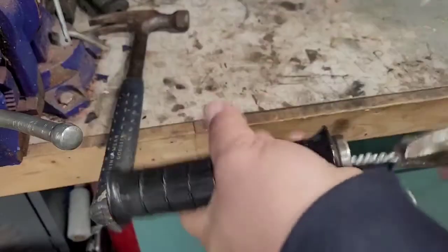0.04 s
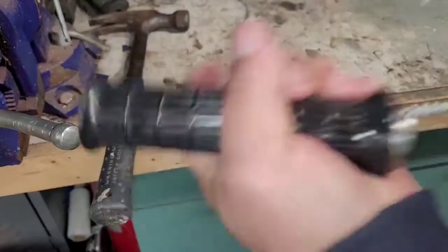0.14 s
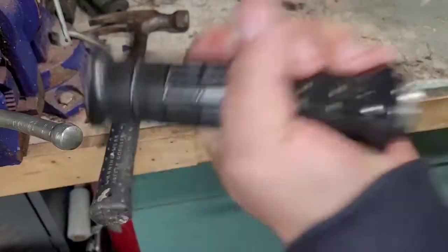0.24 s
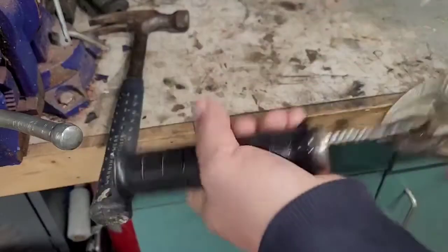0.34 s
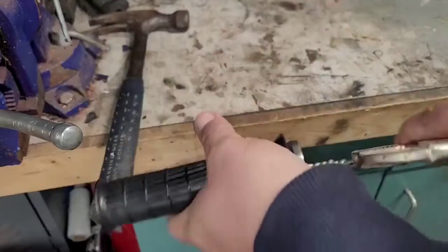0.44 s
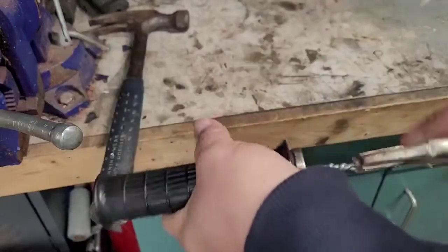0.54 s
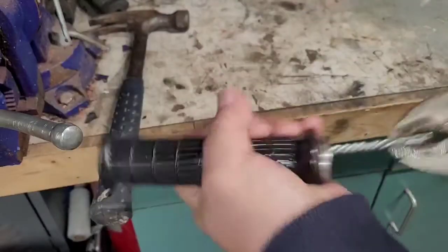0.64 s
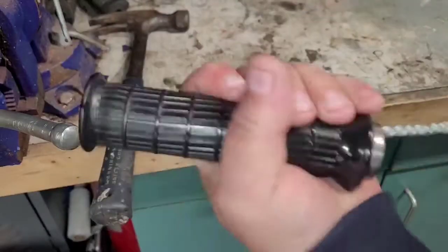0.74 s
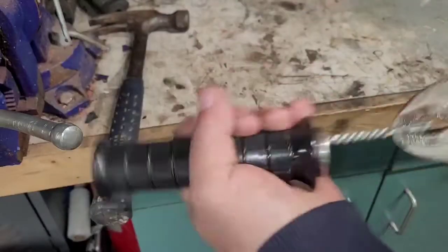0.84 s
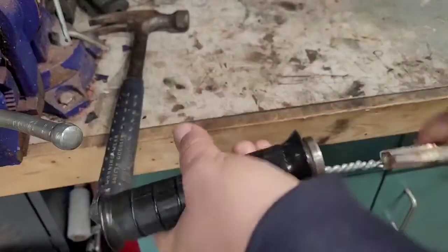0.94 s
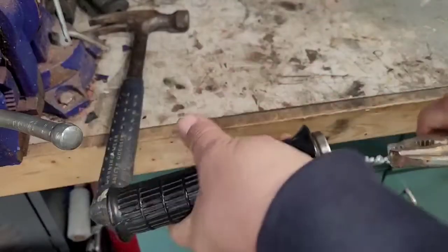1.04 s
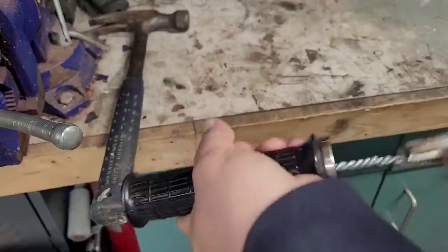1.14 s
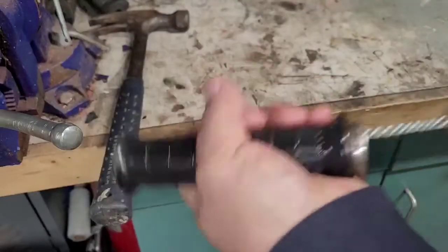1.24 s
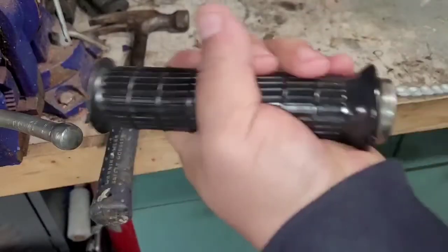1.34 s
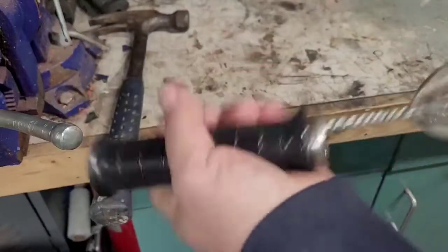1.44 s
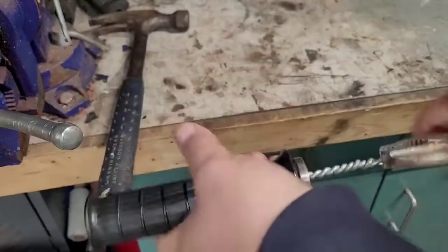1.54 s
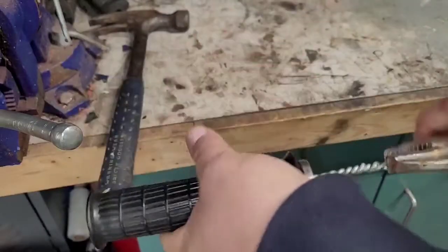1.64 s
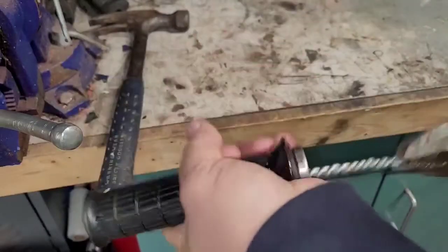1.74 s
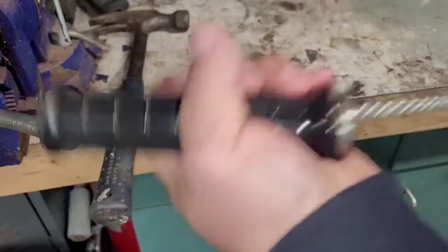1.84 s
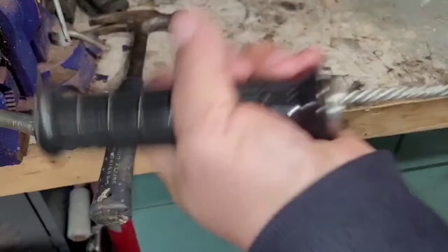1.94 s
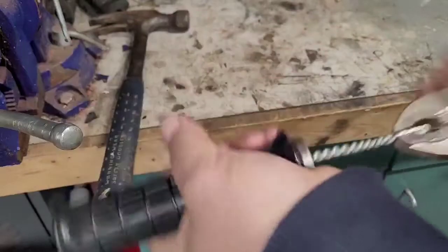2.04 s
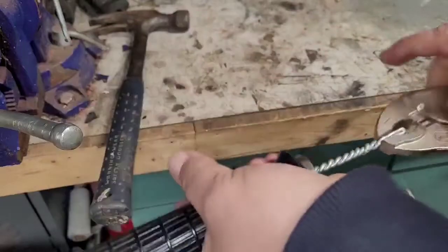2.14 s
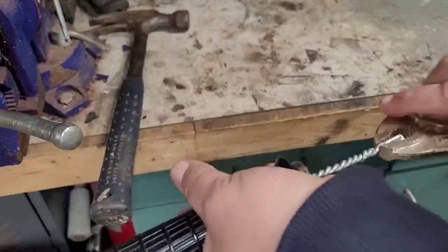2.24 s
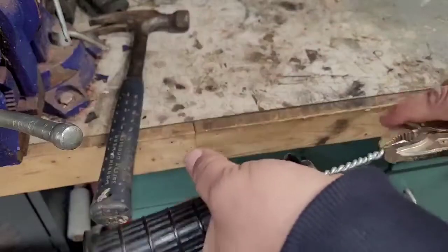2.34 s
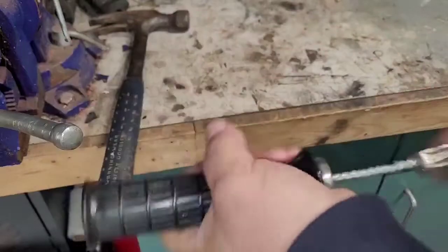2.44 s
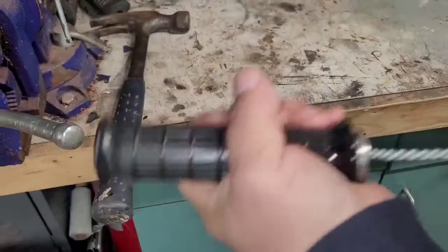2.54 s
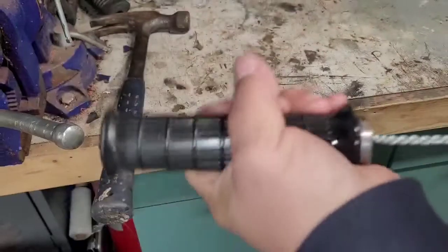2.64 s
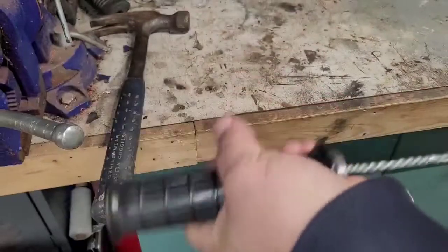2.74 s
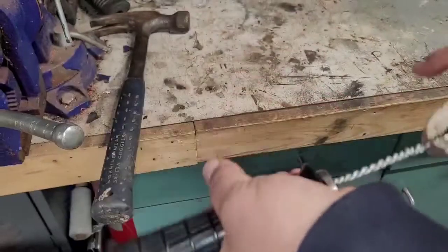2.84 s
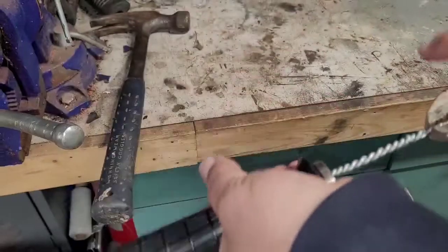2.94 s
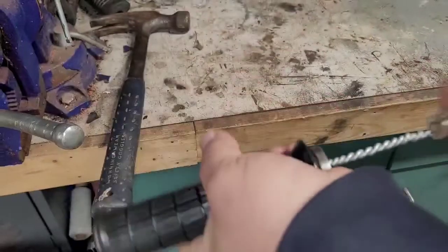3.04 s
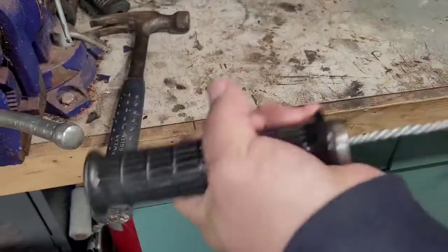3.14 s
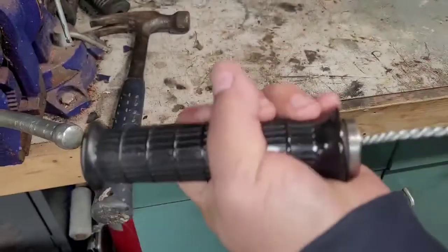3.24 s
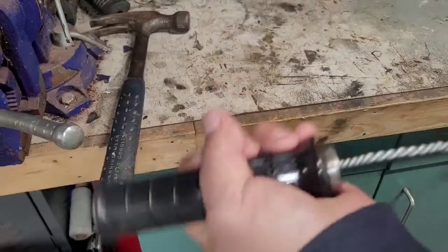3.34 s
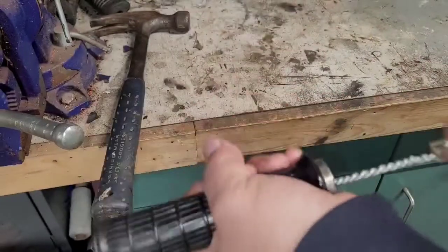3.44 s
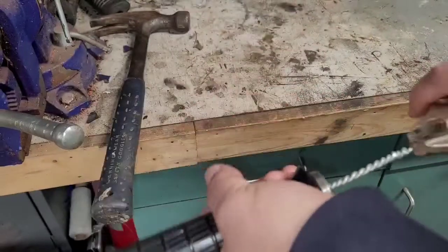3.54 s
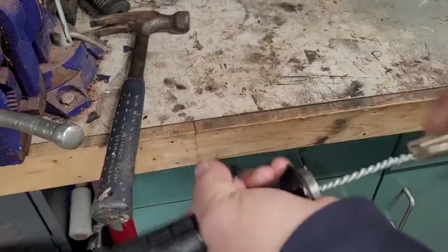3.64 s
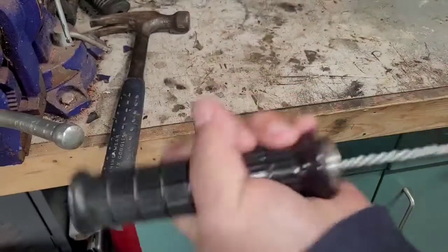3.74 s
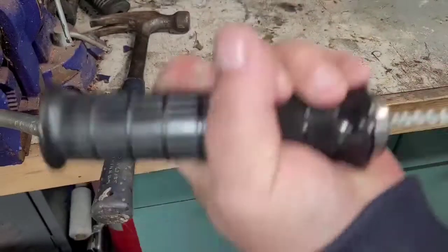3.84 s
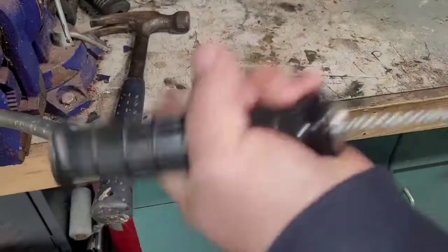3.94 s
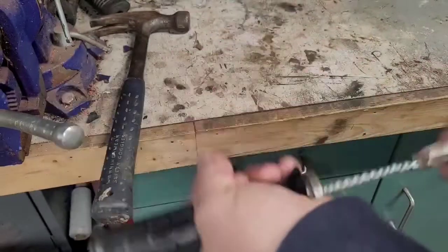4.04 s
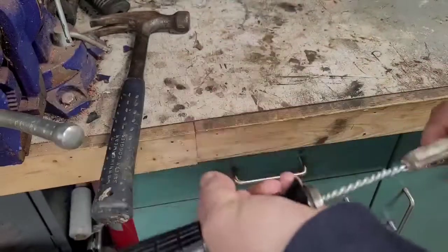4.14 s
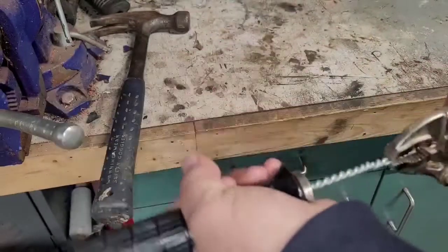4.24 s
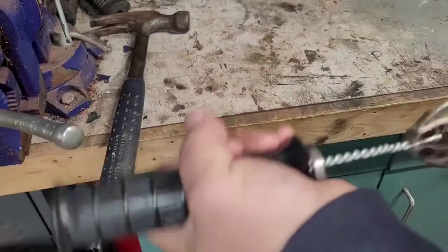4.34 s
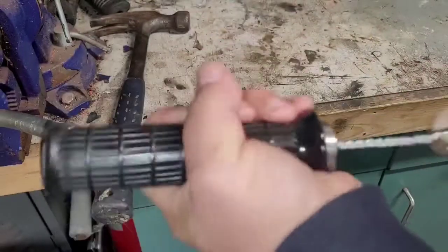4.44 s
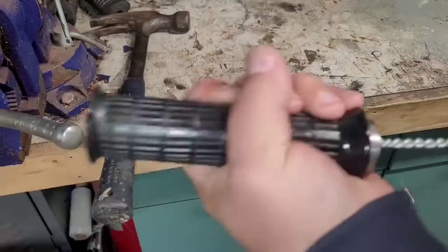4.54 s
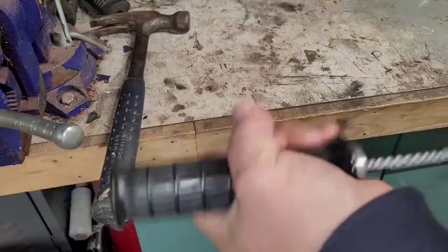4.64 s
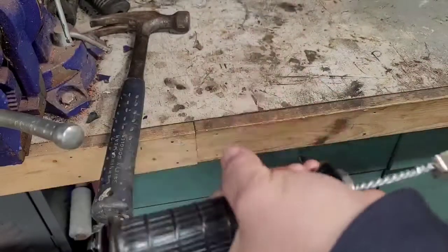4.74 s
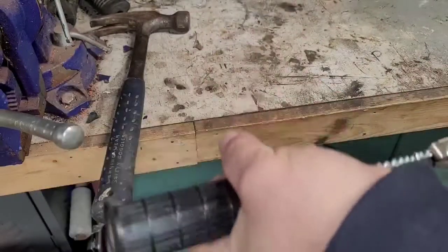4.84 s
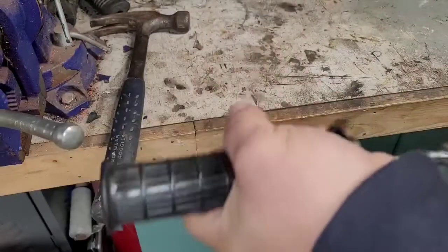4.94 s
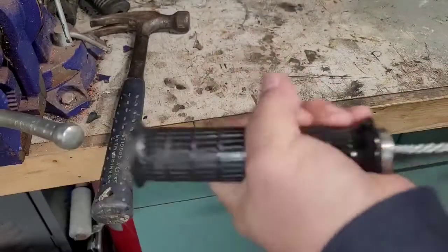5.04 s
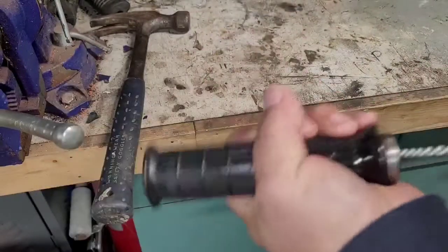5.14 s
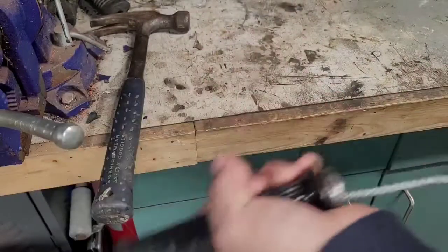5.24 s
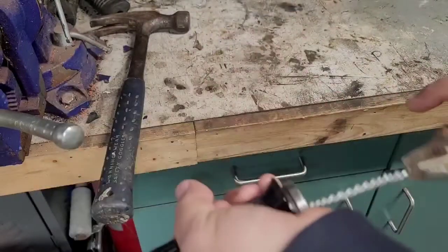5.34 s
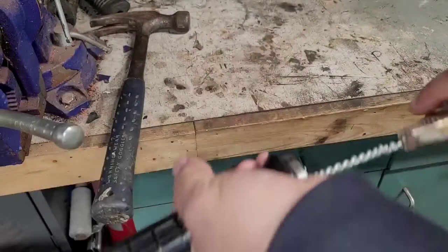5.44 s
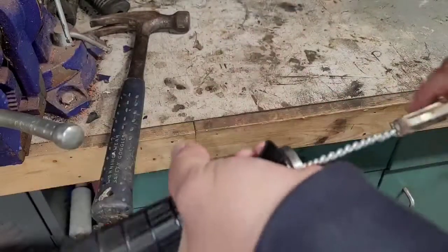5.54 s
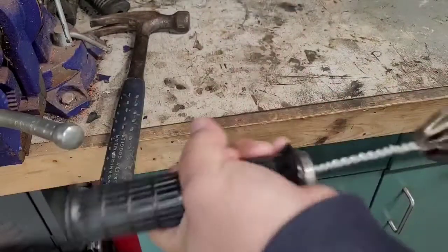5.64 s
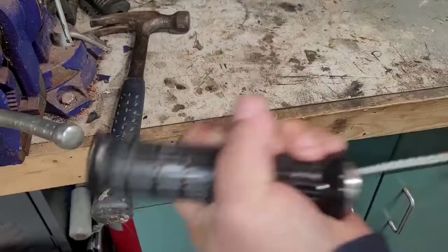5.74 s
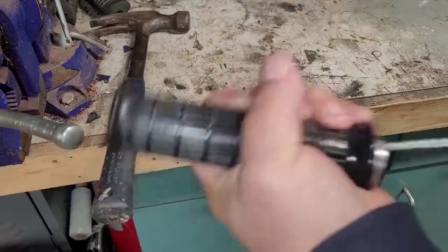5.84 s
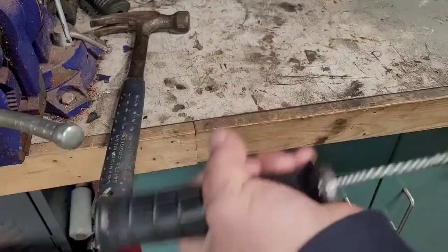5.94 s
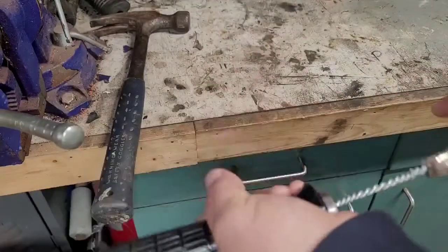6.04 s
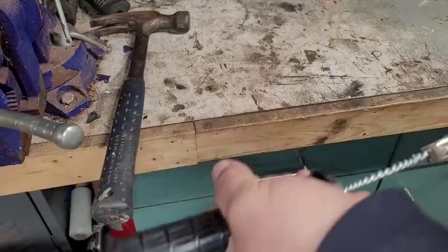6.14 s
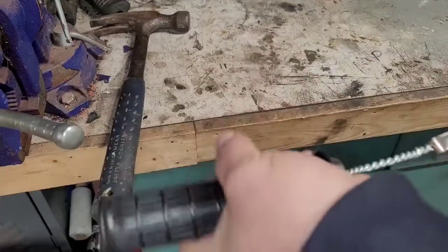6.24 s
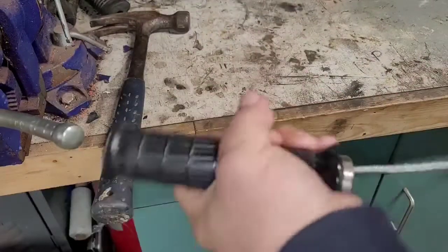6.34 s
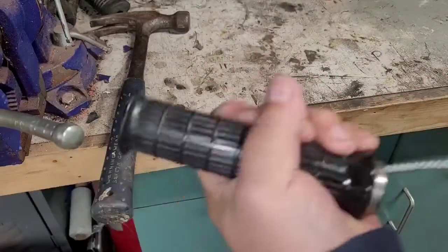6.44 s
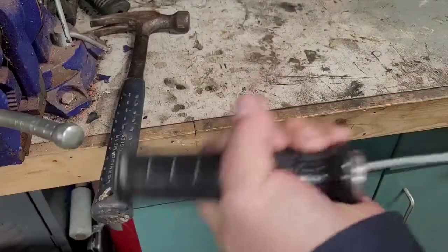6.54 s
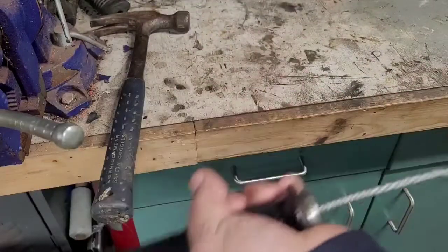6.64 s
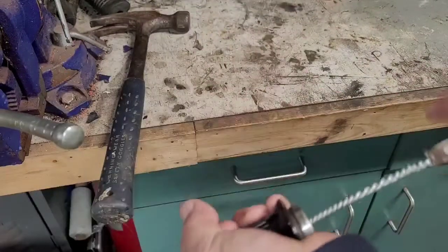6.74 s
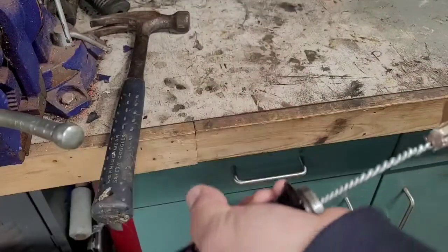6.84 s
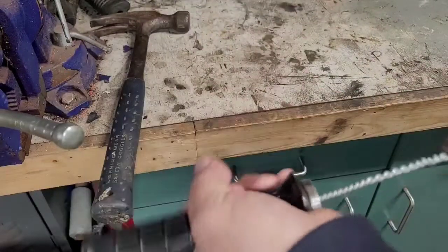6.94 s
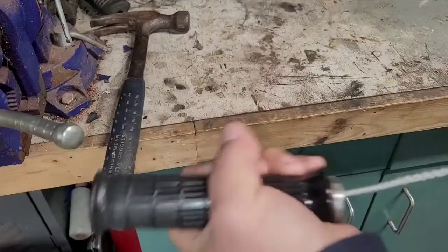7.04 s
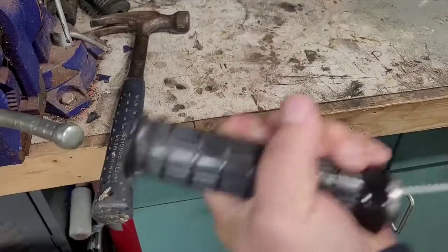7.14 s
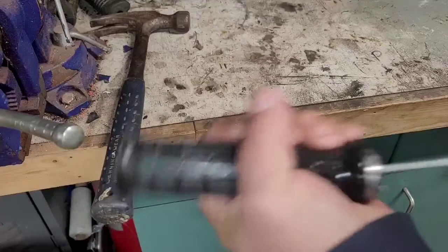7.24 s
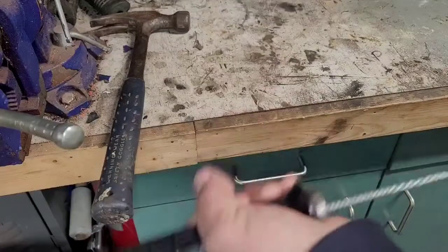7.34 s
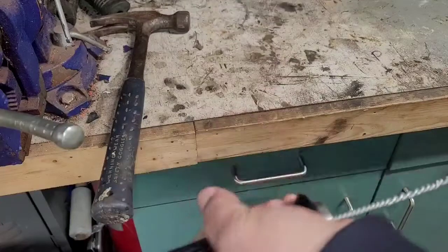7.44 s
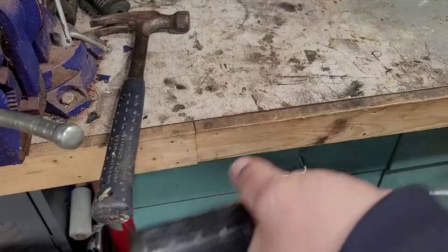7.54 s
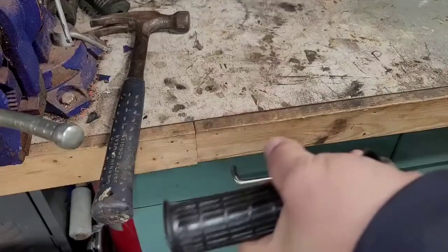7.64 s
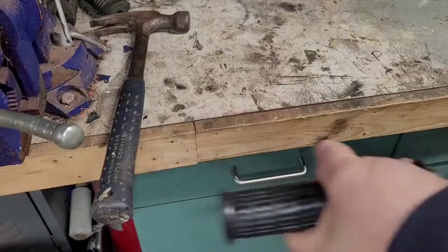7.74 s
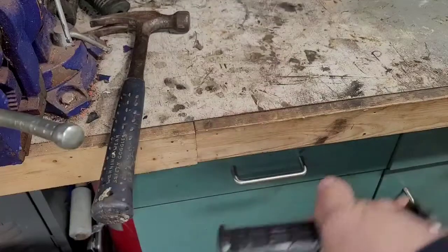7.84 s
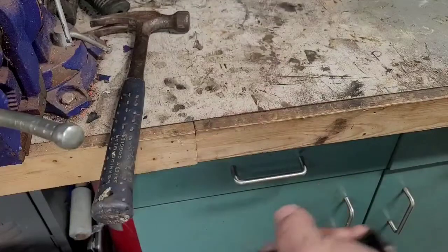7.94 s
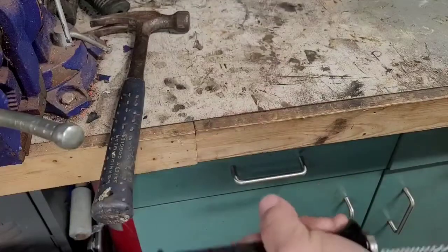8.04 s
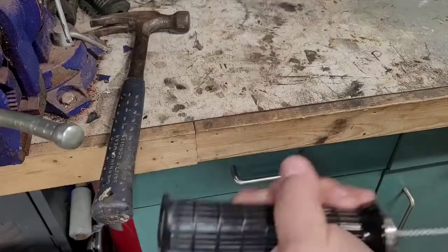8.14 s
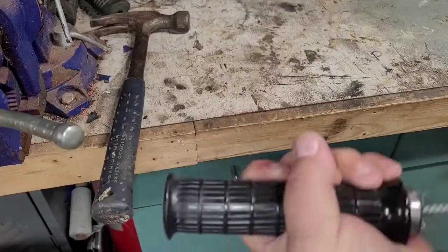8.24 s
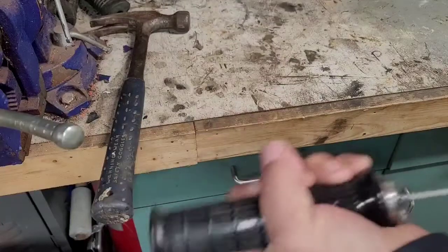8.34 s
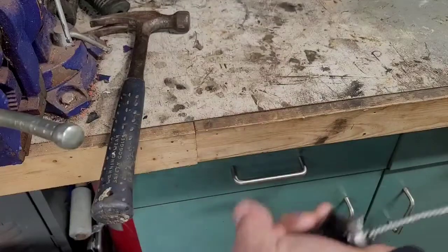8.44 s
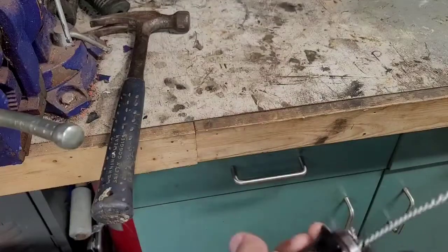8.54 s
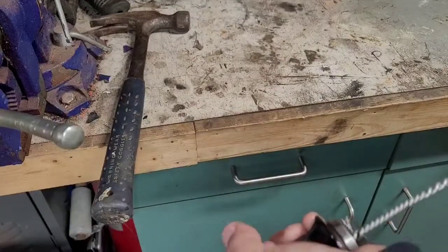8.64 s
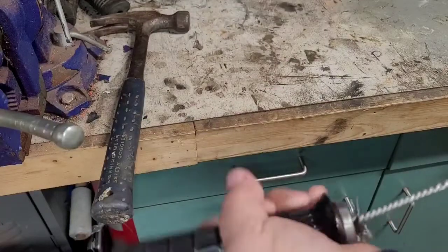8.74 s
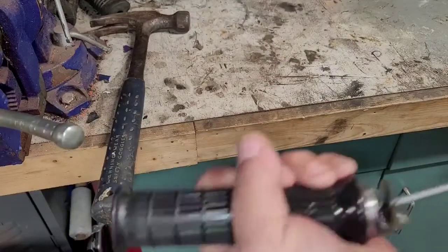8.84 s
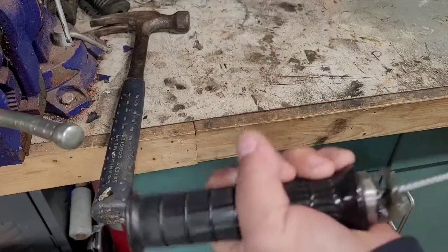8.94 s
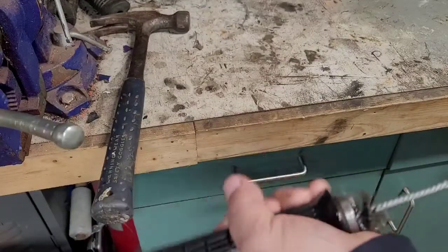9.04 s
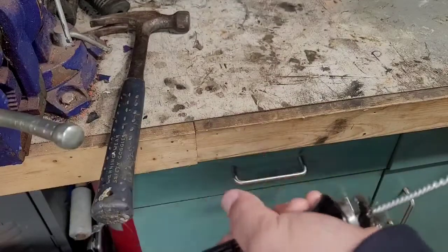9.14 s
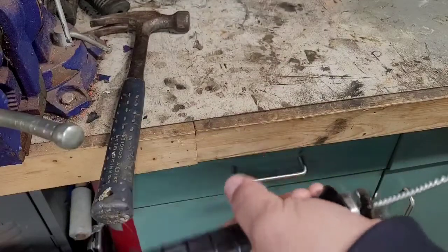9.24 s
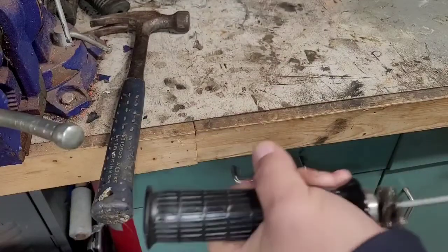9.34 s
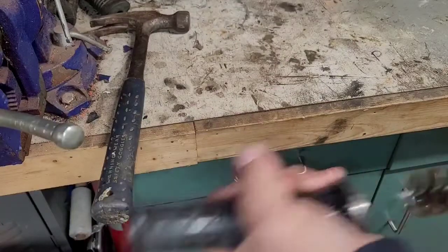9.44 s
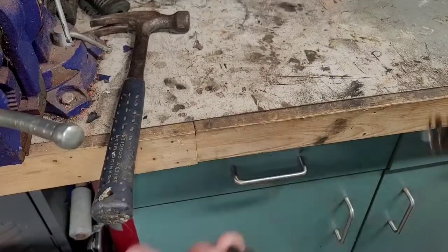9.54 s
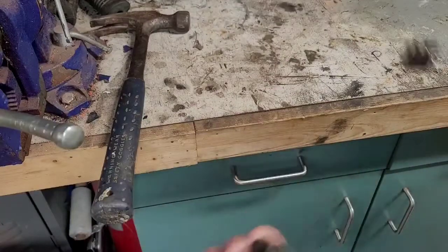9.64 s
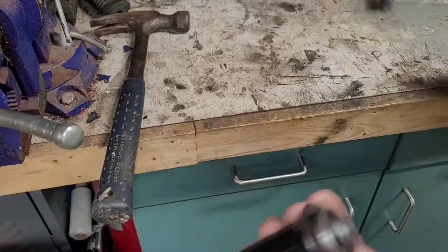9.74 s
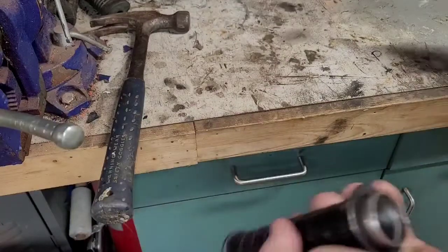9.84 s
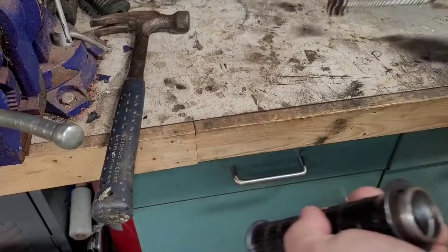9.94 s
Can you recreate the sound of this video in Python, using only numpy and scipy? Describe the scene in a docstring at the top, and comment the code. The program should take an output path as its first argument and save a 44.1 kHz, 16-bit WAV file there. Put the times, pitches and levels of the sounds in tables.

```python
"""A garage workbench, close up: a wire brush is pulled and pushed through a steel tube held in pliers.
Its wires flick along the bore in a bright rasp of shaped noise bursts, and the air column rings hollow.
Stem, tube and pliers clink as noise cracks and decaying sines; there are dull jolts, pops and squeaks.
Pulls are mostly loud and pushes mostly soft; behind them lie a short reverberation, arm shuffle,
rumble and a low hum."""
import sys
import numpy as np
from scipy import signal
from scipy.fft import rfft, irfft, next_fast_len
from scipy.io import wavfile
from scipy.ndimage import uniform_filter1d, map_coordinates

SR = 44100
rng = np.random.default_rng(int(sys.argv[2]) if len(sys.argv) > 2 else 0)


def dump_mix(stems):
    """Bounce the given channels to the path in sys.argv[1] as a 16-bit WAV at rate SR."""
    frames = np.atleast_2d(stems).T  # one column per channel
    limited = np.clip(frames, -1, 1)  # hard clip at full scale
    pcm = np.round(limited * 32767).astype(np.int16)
    wavfile.write(sys.argv[1], SR, pcm)


N = 440990
TIME = np.arange(N) / SR  # s

# hard pulls of the brush; levels are relative, before the trims in brush():
# (fastest moment t/s, speeding up t/s, slowing down t/s, level/dB,
#  hollow ring level/dB, sizzle level/dB, bite level/dB)
PULL_STROKES = [(0.209, 0.11, .11, -27, -20.5, 7, 0.5), (.738, 0.094, .11, -28.5, -16.5, 7.5, -0.5),
                (1.316, 0.13, .12, -30, -16.5, 7, 2.5), (1.891, 0.13, .1, -28.5, -16.5, 5, 4),
                (2.593, 0.15, 0.1, -29, -17, 5.5, 1), (3.226, 0.15, 0.12, -27.5, -20, 2, 3),
                (3.868, 0.2, 0.12, -32, -19.5, 5.5, 5.5), (4.58, 0.23, 0.069, -31, -20, 7.5, 3),
                (5.148, 0.19, 0.071, -28.5, -18, 5, -1), (5.844, 0.24, 0.058, -29, -17.5, 6.5, 2.5),
                (6.473, .16, .14, -29, -14, 4, 2.5), (7.204, 0.26, 0.095, -28, -17.5, 2.5, 1.5),
                (7.697, .12, 0.031, -36.5, -9, 7.5, 5), (8.264, .17, 0.17, -34, -17.5, 5, -1.5),
                (8.904, .14, 0.1, -29, -13, 2.5, 0.5), (9.482, 0.16, 0.068, -33.5, -14, 7.5, -3.5)]
# pushes back into the bore, some in several shoves; levels as for the pulls:
# (fastest moment t/s, speeding up t/s, slowing down t/s, level/dB, hollow ring level/dB, sizzle level/dB)
PUSH_STROKES = [(.355, 0.037, 0.15, -54, -15, -4), (.895, 0.063, 0.085, -52, -14, 2),
                (1.5, 0.064, 0.13, -52.5, -15, -2), (2.05, .08, 0.23, -50.5, -9, 3),
                (2.755, 0.076, 0.064, -52, -8.5, 2), (3.554, 0.14, 0.13, -36, -8, 2.5),
                (4.103, 0.14, .12, -32.5, -16, 7), (4.264, 0.074, 0.09, -41.5, -10.5, 7),
                (4.694, 0.069, 0.18, -45.5, -10, 0.5), (5.3, 0.12, 0.078, -38.5, -13.5, 1),
                (5.389, 0.057, 0.042, -57, -22, 2), (5.996, 0.11, .07, -38.5, -18.5, 1),
                (6.17, 0.063, 0.029, -52.5, -17, 3), (6.712, 0.21, .04, -41.5, -16, 5),
                (7.33, 0.1, 0.32, -49.5, -15, 7), (7.411, 0.047, 0.027, -37.5, -31, 2),
                (7.83, .13, 0.068, -40.5, -8.5, -1), (8.012, 0.1, 0.47, -47, -17, 3),
                (8.45, 0.082, 0.06, -42, -11, 5), (8.57, 0.11, 0.12, -49.5, -14, 4),
                (9.129, .12, 0.098, -43, -6, 11)]


def amp(db):
    """Decibels to gain."""
    return 10 ** (np.asarray(db) / 20)


def unit(x):
    """Scaled to rms 1."""
    return x / np.sqrt(np.mean(x ** 2) + 1e-20)


def along(points, hz):
    """(f/Hz, value) points read on a log frequency axis."""
    f, v = np.transpose(points)
    return np.interp(np.log(hz + 1), np.log(f + 1), v)


def curves(rows):
    """One value per sample for each column after the time."""
    s, *cols = np.transpose(rows)
    return [np.interp(TIME, s, c) for c in cols]


def wobble(rate):
    """A smooth random curve, rate knots a second."""
    knots = rng.standard_normal(int(N * rate / SR) + 4)
    return map_coordinates(knots, [TIME * rate], order=2)


def filtered(x, response):
    """x times a response of frequency."""
    m = next_fast_len(N + SR // 2)
    spectrum = rfft(x, m) * response(np.fft.rfftfreq(m, 1 / SR))
    return irfft(spectrum, m)[..., :N]


def resonances(modes, hz):
    """Causal response of (f/Hz, width f/Hz, level/dB) modes."""
    return sum(amp(db) * 1j * hz * w / (c * c - hz * hz + 1j * hz * w) for c, w, db in modes)


def stereo_noise(side_db):
    """White noise, partly different on the two sides."""
    mid, side = rng.standard_normal((2, N))
    return unit(np.array([mid + amp(side_db) * side, mid - amp(side_db) * side]))


def brush(level_db, bite_hz=3200, sizzle_hz=11500):
    """Harder strokes free more wires a second; their flicks ring the steel and the air in the bore."""
    # the air column in the bore: (f/Hz, width f/Hz, level/dB)
    air_modes = [(675, 62, 18.5), (746, 220, 2.5)]
    hollow_db, sizzle_db, bite_db = stroke_tone()
    effort = amp(level_db - level_db.max())

    # the rough bore makes the level uneven, by 1.34 dB well above -43 dB and a little less below
    uneven_db = 1.34 - 0.42 / (1 + amp(level_db + 43) ** 2)
    drag = amp(level_db + uneven_db * wobble(rate=51))

    wires = flicks(120 + 6000 * effort, spread_db=2.0, t60=0.008)
    wires = wires + 1.21 * rng.standard_normal((2, N))
    wires = wires + 0.5 * twangs(rate=240, low_hz=1690, high_hz=14460, t60=0.39)
    rasp = unit(filtered(shifting(wires, depth_db=6.5), steel_colour))

    # the angle of the brush changes how much low bite and high sizzle a stroke has
    bite = filtered(rasp, lambda hz: 1 / (1 + (hz / bite_hz) ** 10))
    sizzle = filtered(rasp, lambda hz: 1 / (1 + (sizzle_hz / (hz + 1)) ** 20))
    without_sizzle = unit(rasp - sizzle + (amp(bite_db + 1.12) - 1) * bite)
    rasp = without_sizzle + amp(sizzle_db - 4.5) * unit(sizzle)

    def air_gain(hz):
        return sum(amp(db) * abs(resonances([(c, w, 0)], hz)) ** 2 for c, w, db in air_modes)

    air = unit(filtered(stereo_noise(side_db=-17.0), air_gain))
    return drag * (rasp * amp([[-0.3], [-0.2]]) + amp(hollow_db - 4.5) * air)


def scrape_level():
    """Level in dB: the wires break loose, swell and fade with the hand's speed, and settle on each push."""
    rest_db = -93  # the brush held still
    end_drop_db, arch_power = 24, 2.156  # drop at a stroke's ends; a higher power flattens its top
    stick_share = 0.92  # the wires stick until this share of the speeding-up time is left
    release_s = 0.015  # how quickly they then break loose
    # bent wires creep and settle from the fastest moment of a push
    settle_db, settle_db_per_s, settle_attack_s = -57.5, 63, 0.004

    power = np.full(N, amp(rest_db) ** 2)
    for fastest, rise, fall, db, *_ in list(PULL_STROKES) + list(PUSH_STROKES):
        span = slice(max(0, int((fastest - 2 * rise) * SR)), int((fastest + 2 * fall) * SR))
        t = TIME[span] - fastest
        sliding = 0.5 + 0.5 * np.tanh((t + stick_share * rise) / release_s)
        away = np.abs(t / np.where(t < 0, rise, fall))
        power[span] += (sliding * amp(db - end_drop_db * away ** arch_power)) ** 2
    for fastest, *_ in PUSH_STROKES:
        span = slice(int(fastest * SR), int(fastest * SR) + SR)
        t = TIME[:len(power[span])]
        settling = amp(settle_db - settle_db_per_s * t) * (1 - np.exp(-t / settle_attack_s))
        power[span] += settling ** 2
    return 10 * np.log10(power)


def stroke_tone():
    """Hollow ring, sizzle and bite in dB: the brush tilts gradually from one stroke's angle to the next."""
    push_bite_db = -0.2  # the same for every push, before the trim in brush()
    pulls = [(fastest, hollow, sizzle, bite)
             for fastest, _, _, _, hollow, sizzle, bite in PULL_STROKES]
    pushes = [(fastest, hollow, sizzle, push_bite_db)
              for fastest, _, _, _, hollow, sizzle in PUSH_STROKES]
    return curves(sorted(pulls + pushes))


def flicks(rate, spread_db, t60):
    """Wire tips catch and let go, rate times a second; each leaves a tiny noise burst of random size."""
    sizes = amp(spread_db * rng.standard_normal(N))
    slips = (rng.random(N) < rate / SR) / np.sqrt(rate) * sizes
    decay = amp(-60 * TIME[:SR // 20] / t60)
    energy = signal.fftconvolve(slips ** 2, decay ** 2)[:N]
    return unit(np.sqrt(np.abs(energy)) * rng.standard_normal((2, N)))


def twangs(rate, low_hz, high_hz, t60):
    """Single wires spring free and ring briefly, each at its own pitch."""
    draws = rng.random((int(rate * N / SR), 4))
    t = TIME[:SR // 24]
    hz = low_hz + (high_hz - low_hz) * draws[:, 1:2]
    decay = amp(-60 * t / t60) * (1 - t / t[-1])  # the straight fade ends it sooner than t60
    rings = draws[:, 2:3] * decay * np.sin(2 * np.pi * hz * t)
    index = (draws[:, :1] * N).astype(int) + np.arange(len(t))
    turn = 2 * np.pi * draws[:, 3:]  # each wire radiates its own way
    sides = [np.bincount(index.ravel(), (rings * side).ravel(), N)[:N]
             for side in (np.cos(turn), np.sin(turn))]
    return unit(np.array(sides))


def shifting(x, depth_db, size=512):
    """Ever new groups of wires touch the wall, so patches of the spectrum swell and fade."""
    z = signal.stft(x, nperseg=size)[2]
    field = uniform_filter1d(rng.standard_normal(z.shape), size=3, axis=1)  # across frequency
    field = uniform_filter1d(field, size=14, axis=2)  # across time
    gain = amp(depth_db * np.tanh(unit(field)))
    return unit(signal.istft(z * gain, nperseg=size)[1][:, :N])


def steel_colour(hz):
    """Left and right gain of brush and tube: broad radiation with narrow resonances on top."""
    # the rasp as it radiates to each side: (f/Hz, level/dB per Hz)
    radiation_left = [(60, -48), (250, -13), (450, -21.5), (1200, -14), (1950, -3.5), (2650, -6.5),
                      (4100, 0), (6200, -4), (7600, 0), (8800, -3.5), (10500, 4), (12500, 2), (14500, 3)]
    radiation_right = [(60, -39), (300, -11), (600, -6.5), (1000, -56), (1400, -20.5), (1800, -4),
                       (2600, -5), (4300, -1.5), (6300, -1.5), (7300, 4.5), (8500, 0.5), (10600, 1.5),
                       (12600, 15.5), (14500, 3.5)]
    # steel resonances: (f/Hz, width f/Hz, left level/dB, right level/dB)
    steel_modes = [(1950, 260, 1, 6), (2860, 170, 3, 3), (5120, 240, 4, 5), (5485, 100, 0, 6),
                   (7170, 120, 1, 6), (7900, 220, 4, 3), (8960, 130, 0, 4), (9380, 70, 0, 4),
                   (10600, 70, 0, 3)]
    db = np.array([along(radiation_left, hz), along(radiation_right, hz)])
    for centre, width, left, right in steel_modes:
        db += np.outer([left, right], 1 / (1 + (2 * (hz - centre) / width) ** 2))
    return amp(db)


def rattle(level_db):
    """The stem chatters dully against the bore and stray wires tick, both following the scraping level."""
    chatter = flicks(rate=64, spread_db=-1.5, t60=0.046)
    chatter = unit(filtered(chatter, lambda hz: resonances([(250, 184, 0)], hz) ** 2))
    ticks = unit(filtered(flicks(rate=13, spread_db=-4.5, t60=0.024), steel_colour))
    return amp(level_db - 35.5) * chatter + amp(level_db / 2 - 35.5) * ticks


def clinks(ring_db=-2, modes_db=-12, t60=0.065, attack=0.0013):
    """Each contact is a crack, a very high buzz of wires and a short ring of the stem at new strengths."""
    # stem and pliers clink on the tube, before the trims below: (t/s, level/dB, high ring level/dB)
    contacts = [(0.661, -32.5, -2), (1.197, -50, -5), (1.505, -37, -1), (1.777, -42, -5), (2.17, -38, -10),
                (2.926, -34.5, 11), (3.403, -37.5, -5), (3.496, -12.5, -17), (4.339, -32, 2),
                (4.446, -24, -9), (4.665, -30, -8), (4.911, -35, -3), (4.998, -29, -12), (5.303, -28.5, 7),
                (5.907, -25, -3), (6.102, -45.5, 8), (7.397, -22, 6.5), (7.776, -26, -17), (7.841, -23, 4),
                (7.952, -48, 8), (8.725, -42, -13), (8.911, -22, -4), (9.058, -28, 3), (9.204, -25, 8)]
    # what the stem and the pliers ring with: (f/Hz, level/dB, t60 t/s)
    stem_modes = [(3200, -21, 0.1), (3980, -8, 0.04), (7200, -4.5, 0.044), (8300, -8, 0.042),
                  (9010, -4.5, 0.068), (10300, -24, 0.046), (12600, -14, .04), (12600, -2, 0.021),
                  (13300, -6, 0.022)]
    blows, buzz, rings = np.zeros(N + SR), np.zeros(N + SR), np.zeros((2, N + SR))
    t = TIME[:SR // 4]
    onset = 1 - np.exp(-t / attack)
    for s, db, high_db in contacts:
        span = slice(round(s * SR), round(s * SR) + len(t))
        blow = amp(db) * (amp(-60 * t / t60) + 0.32 * amp(-60 * t / 0.007)) * onset
        blows[span] += blow
        buzz[span] += amp(high_db) * blow
        for hz, mode_db, life in stem_modes:
            size_db, phase = rng.standard_normal((2, 2, 1))  # one of each per side
            decay = amp(db + high_db + mode_db + 1.6 * size_db - 60 * t / life)
            rings[:, span] += onset * decay * np.sin(2 * np.pi * (hz * t + phase))
    crack = unit(filtered(rng.standard_normal((2, N)), steel_colour))
    high = unit(filtered(rng.standard_normal((2, N)), lambda hz: resonances([(13000, 350, 0)], hz)))
    cracks = blows[:N] * crack
    buzzes = amp(ring_db) * buzz[:N] * high * amp([[-12], [3]])
    return amp(-4.5) * (cracks + buzzes) + amp(modes_db) * rings[:, :N] * amp([[-5], [2]])


def jolts(t60=0.085):
    """Dull knocks through the pliers and the hands."""
    # the brush snags and jolts the tube, before the 5 dB lift below: (t/s, level/dB)
    snags = [(0.22, -40.5), (0.764, -40.5), (1.328, -51), (3.862, -48), (5.828, -44), (7.838, -42)]
    push = np.zeros(N + SR)
    t = TIME[:SR // 4]
    for s, db in snags:
        push[round(s * SR):][:len(t)] += amp(db - 60 * t / t60) * (1 - np.exp(-t / 0.0022))
    body = filtered(stereo_noise(side_db=-10),
                    lambda hz: resonances([(123, 25, 2), (268, 100, -1)], hz))
    return amp(5.0) * push[:N] * unit(body)


def pops(t60=0.097, attack=0.0064):
    """The air in the bore swells to a hollow note and rings out."""
    # the brush plugs the bore and pops its air column, before the 11 dB lift: (t/s, level/dB, f/Hz)
    air_pops = [(5.055, -42.5, 687), (5.125, -42.5, 657), (6.49, -43, 694), (7.18, -40, 660),
                (7.825, -44.5, 660), (8.975, -45, 675), (9.402, -43, 680), (9.46, -41.5, 676),
                (9.512, -38.5, 718)]
    out, t = np.zeros(N + SR), TIME[:SR // 4]
    for s, db, hz in air_pops:
        swell = amp(db - 60 * t / t60) * (1 - np.exp(-t / attack))
        out[round(s * SR):][:len(t)] += swell * np.sin(2 * np.pi * hz * t)
    return amp(11.0) * out[:N]


def squeaks(unsteady_hz=70):
    """Wires stick and slip together for a moment at a wavering pitch."""
    # wires squeak briefly during a stroke: (t/s, length t/s, f/Hz, peak level/dB)
    squeak_rows = [(4.752, 0.065, 3340, -60), (7.63, 0.13, 2870, -53), (9.133, 0.068, 2880, -48.5)]
    drift = 2 * np.pi * np.cumsum(unsteady_hz * wobble(rate=120)) / SR
    out = np.zeros(N)
    for s, length, hz, db in squeak_rows:
        swell = np.sin(np.pi * np.clip((TIME - s) / length, 0, 1))
        out += amp(db) * swell * np.sin(2 * np.pi * hz * TIME + drift)
    return out


def garage(x):
    """The walls answer briefly, the treble dying first."""
    # how long the garage rings: (f/Hz, t60 t/s)
    decay_times = [(200, 0.52), (2000, 0.15), (13000, 0.079)]
    hz, t, z = signal.stft(rng.standard_normal((2, SR // 2)), SR, nperseg=256)
    fading = z * amp(-60 * t / along(decay_times, hz)[:, None])
    tail = signal.istft(fading, SR, nperseg=256)[1]
    return signal.fftconvolve(x, tail / np.linalg.norm(tail[0]), axes=1)[:, :N]


def background(level_db):
    """Room rumble, mains hum, and the dull shuffle of the arm, louder when the work is busy."""
    # the garage background: (f/Hz, level/dB per Hz)
    room_tone = [(20, -15), (50, 7), (90, -1.5), (140, -0.5), (190, -6.5), (300, -2), (550, -5), (900, -7),
                 (1500, -22), (3000, -25), (14500, -22.5)]
    arm_db, arm_follow, arm_lag_s = -64, 0.19, 0.86  # level, dB per dB of scraping, averaging time
    rumble = unit(filtered(stereo_noise(side_db=-3.0), lambda hz: amp(along(room_tone, hz))))
    hum = np.sin(2 * np.pi * 120 * TIME + 0.08 * wobble(rate=3.34))

    arm_modes = [(56.0, 56, -1.5), (129, 92, -0.5), (283, 270, -1.5)]  # (f/Hz, width f/Hz, level/dB)
    shuffle = filtered(stereo_noise(side_db=-43.0), lambda hz: resonances(arm_modes, hz) ** 2)
    busy_db = uniform_filter1d(level_db - level_db.mean(), size=int(arm_lag_s * SR))
    shuffle_db = arm_db + arm_follow * busy_db + 3.8 * wobble(rate=12)

    rumble = amp(-62 + wobble(rate=5.2)) * rumble * amp([[-0.7], [0.7]])  # swings by about 1 dB
    return rumble + amp(-65) * hum + amp(shuffle_db) * unit(shuffle)


def scene():
    """The work close by, with the room behind it."""
    level_db = scrape_level()
    work = brush(level_db) + rattle(level_db) + clinks() + jolts() + pops() + squeaks()
    return work + amp(-12.0) * garage(work) + background(level_db)


def record(dry, top_hz=14500):
    """The recorder cuts off steeply above its band limit."""
    return filtered(dry, lambda hz: 1 / np.sqrt(1 + (hz / top_hz) ** 300))


dry = scene()
out = record(dry)
dump_mix(out)
```